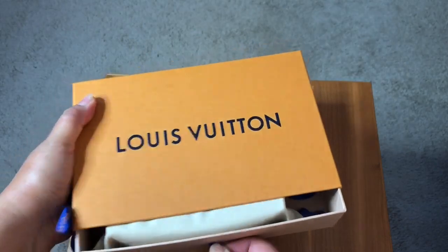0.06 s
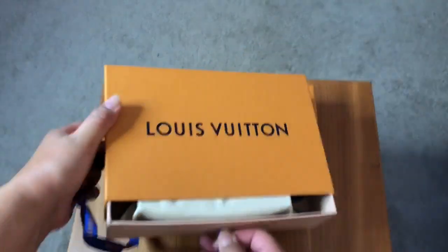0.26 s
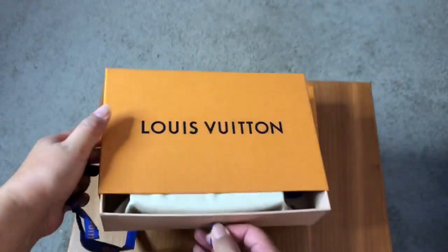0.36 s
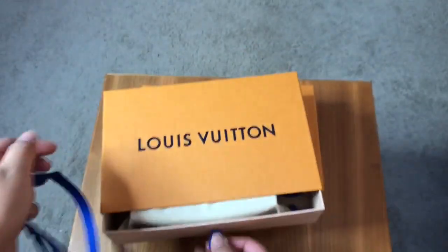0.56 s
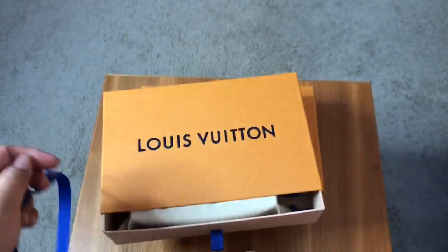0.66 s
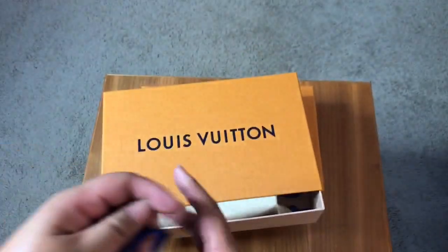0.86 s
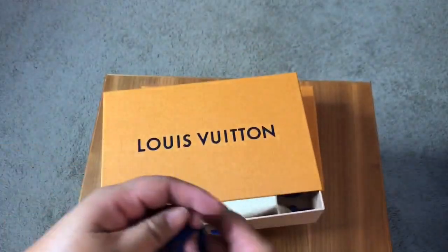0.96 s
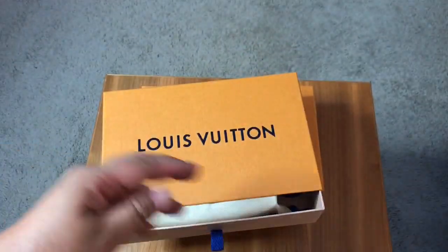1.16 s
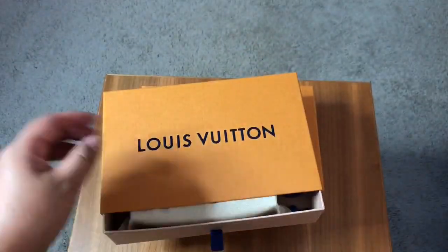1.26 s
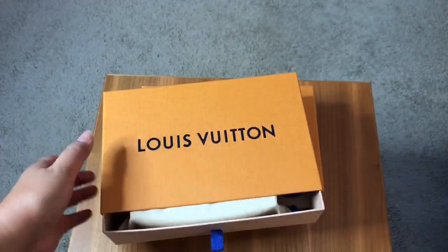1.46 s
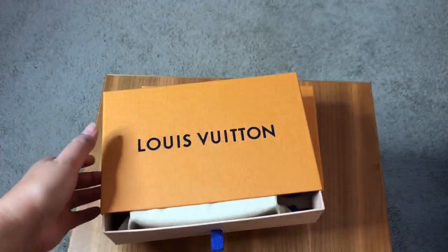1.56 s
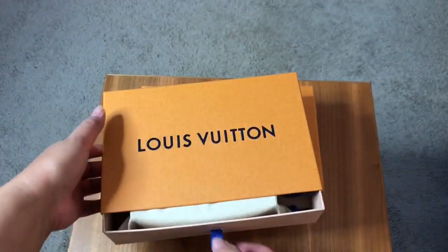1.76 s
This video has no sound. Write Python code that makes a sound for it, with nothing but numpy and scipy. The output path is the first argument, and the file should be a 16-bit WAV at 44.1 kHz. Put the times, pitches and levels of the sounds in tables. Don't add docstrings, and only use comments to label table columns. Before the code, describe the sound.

A stiff cardboard box is put down on a wooden table, close to the microphone in a quiet room. Fingers rub it with faint knocks at first; an edge lands with a hollow, papery clatter at 0.23 seconds. The base thumps at 0.46 and rocks until about 0.57. Faint ribbon rustles follow, a light tap at 1.49, then soft palm rubbing to the end over low air rumble.

```python
import sys
import numpy as np
from scipy import signal
from scipy.fft import rfft, irfft, next_fast_len
from scipy.io import wavfile
from scipy.ndimage import map_coordinates

SR = 44100
rng = np.random.default_rng(int(sys.argv[2]) if len(sys.argv) > 2 else 0)


def makeup_ratio(level_db):
    decades = np.asarray(level_db, float) / 20
    return 10 ** decades


def wav_record(signal):
    frames = np.transpose(np.atleast_2d(signal))
    bounded = np.clip(frames, -1, 1)
    quanta = np.round(bounded * 32767).astype(np.int16)
    wavfile.write(sys.argv[1], SR, quanta)


N = 79380


def unit(x):
    return x / np.sqrt(np.mean(x ** 2) + 1e-20)


def along(points, hz):
    f, v = np.transpose(points)
    return np.interp(np.log(hz + 1), np.log(np.abs(f) + 1), v)


def curve(rows):
    return np.interp(np.arange(N) / SR, *np.transpose(rows))


def wobble(rate):
    return map_coordinates(rng.standard_normal(4000), [np.arange(N) * rate / SR])


def noise(spectrum):
    m = next_fast_len(N + 8192)
    colour = makeup_ratio(along(spectrum, np.fft.rfftfreq(m, 1 / SR)))
    return unit(irfft(rfft(rng.standard_normal(m)) * colour, m)[:N])


# (frequency [Hz], time to fall 60 dB [s])
ROOM_DECAY = [(60, 0.26), (250, .3), (1000, 0.37), (2000, .42), (5000, .45), (8000, .34), (11000, 0.19),
              (13500, 0.04)]
# (frequency [Hz], level [dB])
ROOM_COLOUR = [(60, -2.5), (200, 0), (400, 6), (1000, 4), (5000, 3), (7500, 2.5), (10500, 4), (13000, 0.5)]


def room(x):
    room_db, gap_s = -6.5, 0.0036
    early_db, early_share = 6, .45
    hz, t, z = signal.stft(rng.standard_normal(SR // 2), SR, nperseg=256)
    fall_db = 60 * t / along(ROOM_DECAY, hz)[:, None]
    late, early = makeup_ratio(-fall_db), makeup_ratio(early_db - fall_db / early_share)
    z = z * makeup_ratio(along(ROOM_COLOUR, hz))[:, None] * np.hypot(late, early)
    tail = signal.istft(z, SR, nperseg=256)[1]
    gap = np.zeros(round(gap_s * SR))
    return signal.fftconvolve(x, np.r_[gap, makeup_ratio(room_db) * tail / np.linalg.norm(tail)])


# (frequency [Hz], level [dB])
CRACK_COLOUR = [(300, -22.5), (1500, 0.5), (3600, -2), (5500, -3.5), (8000, -12.5), (10500, -16.5),
                (12500, -24.5), (16000, -39)]


def knocks(contacts, modes, wet_db=0, facing=1):
    choked_t60_s, push_s = .012, .0003
    crack_t60_s, crack_rise_s = 0.01, .0004
    mode_scatter_db = 1.5
    crack_over_thud = 5.1
    out = np.zeros(N + 2 * SR)
    t = np.arange(SR // 4) / SR
    grit = np.pad(noise(CRACK_COLOUR), (0, SR))
    click = np.fft.fftshift(irfft(makeup_ratio(along(CRACK_COLOUR, np.fft.rfftfreq(256, 1 / SR)))))
    click = np.pad(click, (0, len(t) - 256))
    hz, level, t60 = np.transpose(modes)[:, :, None]
    sign = facing ** np.arange(len(modes))[:, None]
    scatter = rng.standard_normal((len(contacts), len(modes), 1))
    for (s, thud_db, crack_db, hard_hz, free_s), chance in zip(contacts, scatter):
        i = round(s * SR)
        ring = makeup_ratio(level + mode_scatter_db * chance - 60 * t / t60) * np.sin(2 * np.pi * hz * t)
        ring = ring * sign / (1 + (hz / hard_hz) ** 2)
        choke = makeup_ratio(thud_db - 60 * np.maximum(t - free_s, 0) / choked_t60_s)
        thud = choke * ring.sum(0) * (1 - np.exp(-t / push_s))
        dull = signal.butter(2, min(crack_over_thud * hard_hz / SR * 2, .9))
        dull_grit, dull_click = signal.lfilter(*dull, [grit[i:][:len(t)], click])
        crack = makeup_ratio(crack_db - 60 * t / crack_t60_s) * (1 - np.exp(-t / crack_rise_s)) * unit(dull_grit)
        echoed_crack = dull_click * np.linalg.norm(crack) / np.linalg.norm(dull_click)
        wet = room(makeup_ratio(wet_db) * thud + echoed_crack)
        out[i:][:len(wet)] += wet
        out[i:][:len(t)] += thud + crack
    return out[:N]


# (time [s], level [dB])
AIR_LEVEL = [(0.0, -35.5), (0.04, -52.5), (0.254, -45.5), (0.766, -41), (0.782, -49), (1.238, -45.5),
             (1.432, -47), (1.584, -36), (1.624, -53.5), (1.77, -39.5), (1.8, -70)]
# (frequency [Hz], level [dB per Hz])
AIR_COLOUR = [(1, -14.5), (5, 10), (15, 2.5), (30, -15), (60, -27.5), (120, -53), (300, -75.5)]
# (frequency [Hz], level [dB per Hz])
QUIET_COLOUR = [(35, -30), (60, 0), (207, -15), (256, -1), (330, -30), (946, -23), (1220, -38), (1510, -32),
                (16000, -35.5)]
# (frequency [Hz], level [dB])
HUM = [(86.1, -64.5), (177.6, -77.5), (263.8, -97), (974.4, -82.5)]


def background():
    t = np.arange(N) / SR
    hum = 0
    for hz, db in HUM:
        level = makeup_ratio(db - 4.5 + 0.68 * wobble(36))
        hum = hum + level * np.sin(2 * np.pi * hz * t + 0.85 * wobble(4.2))
    room_tone = makeup_ratio(-72 + .6 * wobble(1.3)) * noise(QUIET_COLOUR)
    return room_tone + hum + makeup_ratio(curve(AIR_LEVEL)) * noise(AIR_COLOUR)


def rub(pressure, card):
    lumps = makeup_ratio(1.5 * wobble(32) + 0.95 * wobble(750))
    return makeup_ratio(curve(pressure)) * unit(lumps * noise(card))


# (time [s], level [dB])
STROKE = [(0, -55.5), (.06, -63.5), (.12, -59.5), (.2, -68), (.3, -49), (.6, -57), (.8, -61.5),
          (1.1, -72.5), (1.35, -84), (1.8, -88.5)]
# (frequency [Hz], level [dB per Hz])
CARD = [(100, -2), (250, -11), (420, -9.5), (650, -17.5), (1000, -14), (2700, -19.5), (4200, -24),
        (10000, -43)]


def fingers():
    return rub(STROKE, CARD)


# (time [s], thud [dB], crack [dB], contact hardness [Hz], free ring [s])
GRIP = [(.0093, -40, -67.5, 913, .006), (.0232, -43.5, -61, 1807, .003), (.035, -41.5, -70.5, 1509, 0.0071),
        (.0465, -40.5, -63, 1230, 0.011), (.061, -41, -63, 1767, 0.0029), (.074, -44.5, -68, 1200, .005),
        (.083, -43, -74, 900, .006), (.1015, -45, -66.5, 700, .005), (.107, -35.5, -59, 590.5, 0.012),
        (.124, -44, -68, 450, .035), (.181, -50.5, -74, 1507, 0.0049)]
# (frequency [Hz], level [dB], time to fall 60 dB [s])
HELD_MODES = [(225, -11.5, 0.24), (335, -3, 0.12), (425, -7, 0.33), (646, -8.5, 0.087), (890, -1.5, 0.028),
              (1450, -7.5, .03)]


def grip():
    return knocks(GRIP, HELD_MODES)


# (time [s], length [s], level [dB], lowest frequency [Hz], highest frequency [Hz])
RUSTLES = [(0.054, 0.18, -71, 3600, 4530), (0.064, 0.22, -74.5, 5140, 8700),
           (0.104, 0.019, -66.5, 6100, 11200), (0.191, 0.093, -63, 3380, 10200),
           (0.762, 0.0054, -73, 9150, 12280), (.83, .005, -60, 4500, 7000),
           (.836, .012, -76.5, 8000, 12500), (0.898, 0.21, -72, 2590, 6440),
           (.88, 0.16, -80.5, 8000, 10600), (1.035, .08, -67, 4000, 11490), (1.037, .03, -82, 10300, 11400),
           (1.084, 0.02, -70, 4947, 9860), (1.129, 0.015, -71, 4500, 10800),
           (1.175, 0.029, -71.5, 3900, 9100), (1.203, .022, -61.5, 2150, 9400),
           (1.258, 0.037, -79.5, 2530, 7940), (1.352, 0.0055, -74.5, 2700, 4500),
           (1.43, 0.18, -80, 3917, 10000), (1.527, 0.038, -73.5, 3000, 9000),
           (1.563, 0.0057, -74, 7460, 11500)]


def ribbon():
    t = np.arange(N) / SR
    grain = unit(makeup_ratio(3 * wobble(400) + 2.5 * wobble(70)) * rng.standard_normal(N))
    out = np.zeros(N)
    for s, length, db, low_hz, high_hz in RUSTLES:
        band = signal.butter(3, [low_hz / SR * 2, high_hz / SR * 2], "band")
        swell = np.exp(-2 * ((t - s) / (.5 * length)) ** 2)
        out += makeup_ratio(db) * swell * unit(signal.lfilter(*band, grain))
    return out


# (time [s], thud [dB], crack [dB], contact hardness [Hz], free ring [s])
EDGE = [(.2242, -17.5, -34.5, 1494, .004), (.227, -10.5, -14.5, 1421, .004),
        (.2284, -18.5, -15.5, 2000, .003), (.2293, -11.5, -12.5, 2007, .006),
        (.2312, -16.5, -22.5, 1500, .004), (.2365, -16.5, -23, 787.6, .008),
        (.2415, -18.5, -23, 1500, .005), (.2452, -17.5, -17.5, 900, .004), (.248, -16, -27.5, 810.4, .012),
        (.2555, -26, -30, 1200, .008), (.2625, -28.5, -27.5, 900, 0.015), (.273, -23, -31.5, 600, .012)]
# (frequency [Hz], level [dB], time to fall 60 dB [s])
LID_MODES = [(55.6, -22.5, 0.39), (136, -21.5, 0.1), (257, -5, 0.078), (328, -4, 0.083), (440, -2.5, 0.014),
             (512, -3, 0.012), (700, -5, .02), (805, -2, 0.018), (872, -2.5, 0.014), (1020, -13.5, .012),
             (1550, -15, 0.03), (1920, -12.5, 0.01), (2733, -11.5, .012), (3597, -13.5, .025)]


def edge():
    return knocks(EDGE, LID_MODES)


# (time [s], thud [dB], crack [dB], contact hardness [Hz], free ring [s])
BASE = [
    (.4578, -20.5, -25, 2120, 0.0014),
    (.4627, -5, -16, 604, 0.017),
    (.4648, -39, -17, 1630, 0.015),
    (.4872, -14, -45, 398, 0.049),
    (.5207, -23, -22, 700, 0.007),
    (.539, -26, -36.5, 700, 0.0051),
    (.5535, -17.5, -35.5, 452, 0.0029),
    (.568, -25, -52, 475, 0.002),
    (.618, -57, -50, 2000, 0.011),
]
# (frequency [Hz], level [dB], time to fall 60 dB [s])
TABLE_MODES = [(70, -22, .2), (195, -15, 0.05), (289, 3, 0.11), (385, -8, 0.04), (476, -7, 0.04),
               (675, -5, 0.025), (841, -9, 0.02), (1068, -2, 0.03), (1380, -9, .015), (1530, -9, .015),
               (1970, -6, 0.015), (2700, -10, .012), (3650, -8, .012)]


def base():
    return knocks(BASE, TABLE_MODES)


# (time [s], thud [dB], crack [dB], contact hardness [Hz], free ring [s])
CORNER = [
    (.4596, -9, -21.5, 2130, 0.0013),
    (.4612, -11, -25.5, 1510, 0.0071),
    (.5165, -17, -25.5, 1780, .004),
    (.5215, -25, -27.5, 1370, 0.0039),
]
# (frequency [Hz], level [dB], time to fall 60 dB [s])
PANEL_MODES = [(385, -8, .04), (1070, 0, .025), (1380, -8, .015), (1970, -3, .015), (2900, 1, .007),
               (3650, 5, .008), (4500, 0, .007)]


def corner():
    return knocks(CORNER, PANEL_MODES)


# (time [s], pressure [dB])
SLIDE = [(0, -110), (1.33, -95.5), (1.4, -75), (1.47, -70), (1.55, -70), (1.65, -62.5), (1.72, -64.5),
         (1.8, -61)]
# (frequency [Hz], level [dB per Hz])
SIDE_CARD = [(100, 0), (250, -7), (550, -6.5), (950, -19.5), (2000, -14), (2800, -23), (4200, -24.5),
             (9000, -43.5)]


def palm():
    return rub(SLIDE, SIDE_CARD)


# (time [s], thud [dB], crack [dB], contact hardness [Hz], free ring [s])
TAP = [
    (1.4866, -43, -48, 2000, 0.003),
    (1.4895, -52, -58, 1800, .003),
    (1.504, -58, -66, 1400, .006),
    (1.515, -60, -68, 1400, .006),
    (1.535, -64, -72, 1500, .006),
]
# (frequency [Hz], level [dB], time to fall 60 dB [s])
WALL_MODES = [(530, 0, .012), (680, -2, .008), (870, -1, .008), (1090, 0, .008), (1250, -1, .008),
              (1400, 0, .008), (1690, -2, .008), (1950, -4, .008), (2200, -7, .008)]


def tap():
    return knocks(TAP, WALL_MODES, wet_db=11.5, facing=-1)


def scene():
    hits = grip() + edge() + base() + corner() + tap()
    hits = signal.lfilter(*signal.butter(2, 65 / SR * 2, "high"), hits)
    rubs = fingers() + ribbon() + palm()
    return (hits + rubs + room(rubs)[:N] + background())[None]


def low_pass(x):
    return signal.sosfilt(signal.butter(12, 16480, fs=SR, output="sos"), x)


def record(dry):
    return low_pass(dry)


dry = scene()
out = record(dry)
wav_record(out)
```